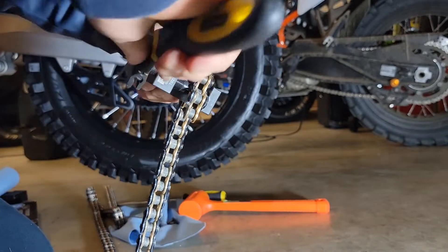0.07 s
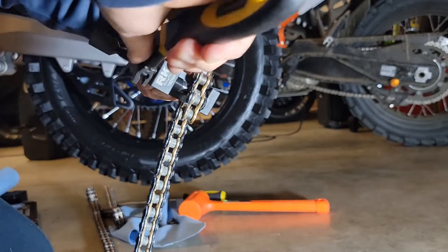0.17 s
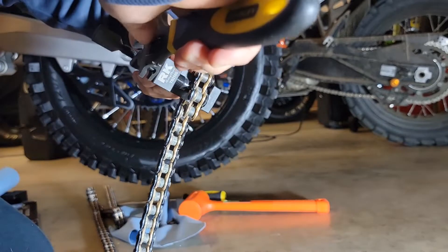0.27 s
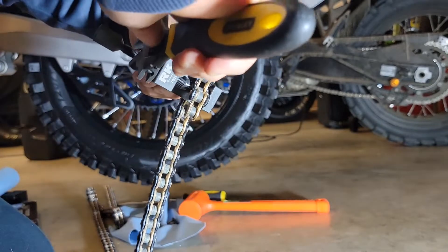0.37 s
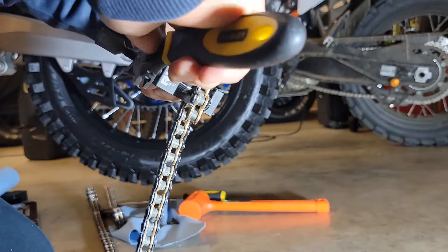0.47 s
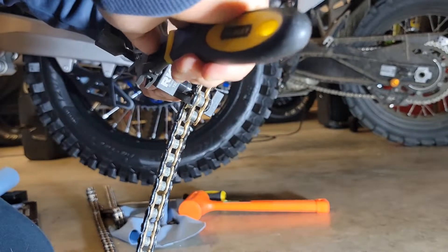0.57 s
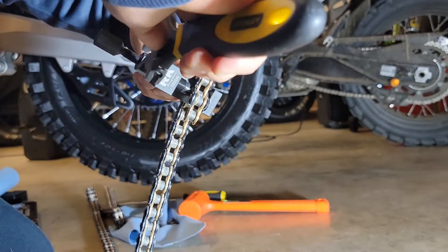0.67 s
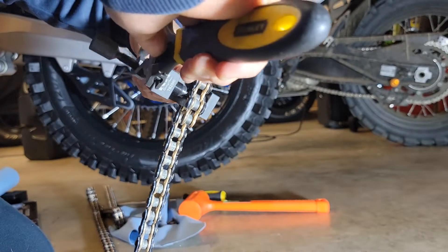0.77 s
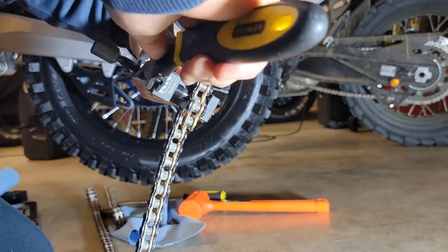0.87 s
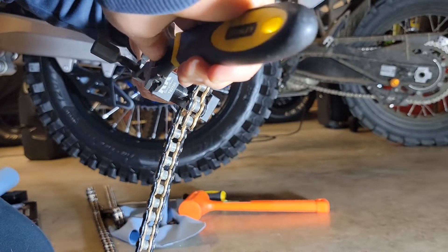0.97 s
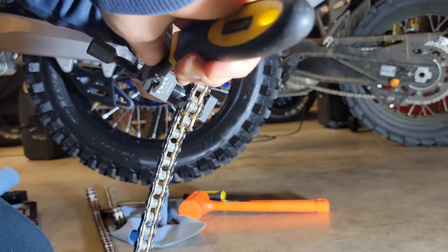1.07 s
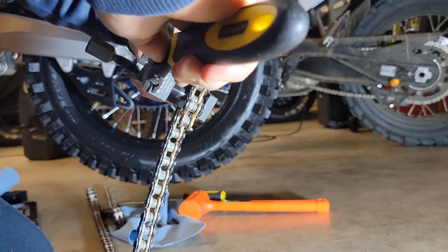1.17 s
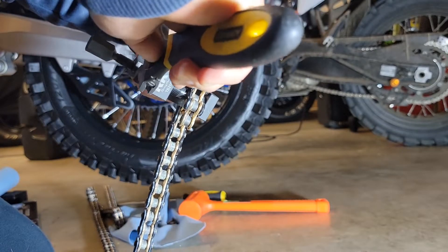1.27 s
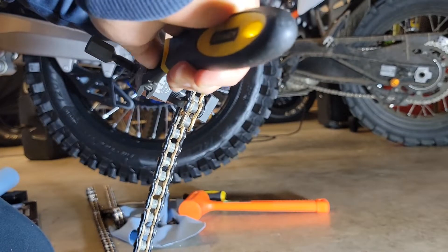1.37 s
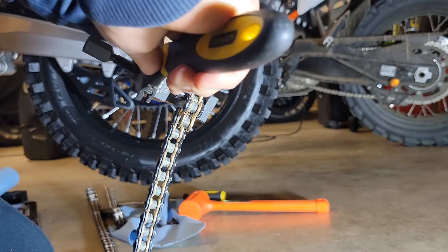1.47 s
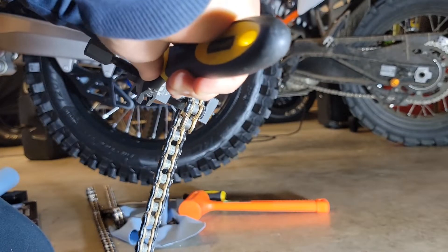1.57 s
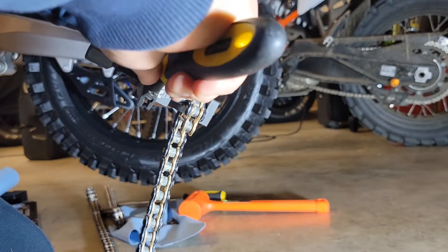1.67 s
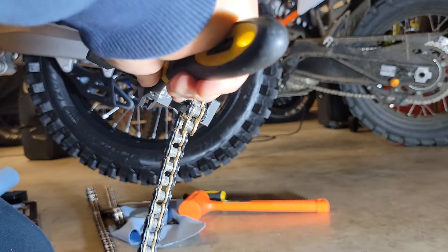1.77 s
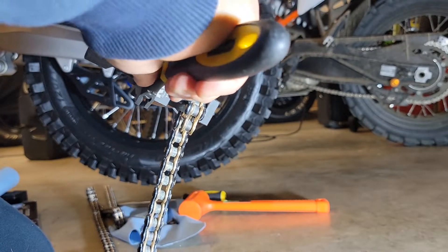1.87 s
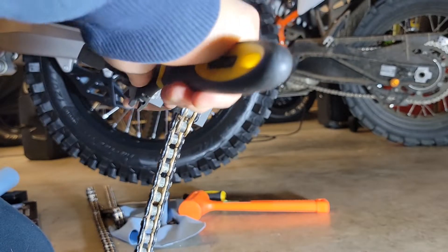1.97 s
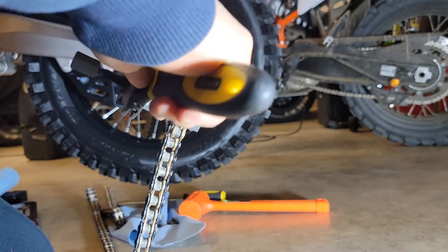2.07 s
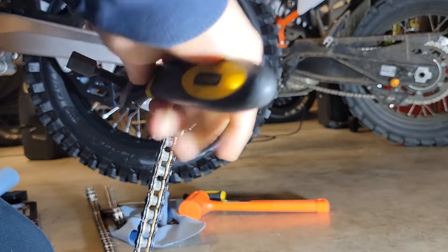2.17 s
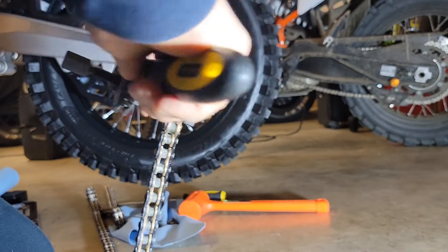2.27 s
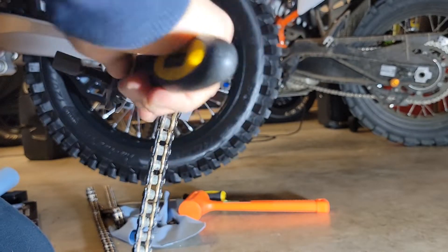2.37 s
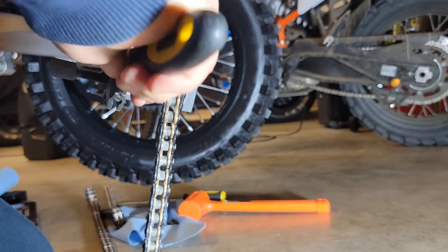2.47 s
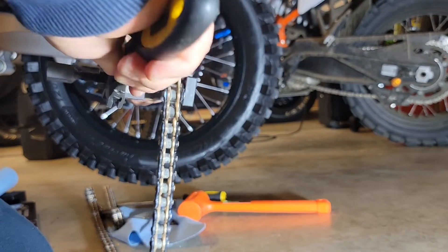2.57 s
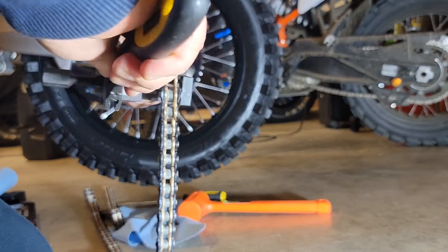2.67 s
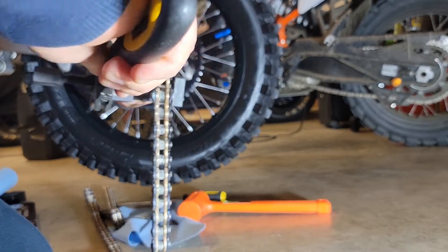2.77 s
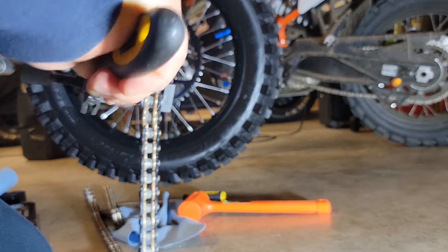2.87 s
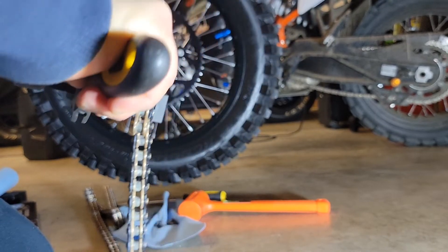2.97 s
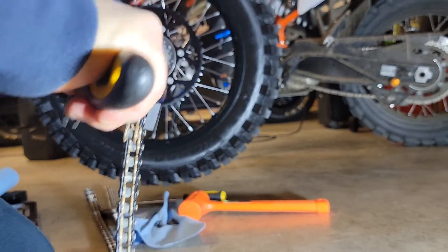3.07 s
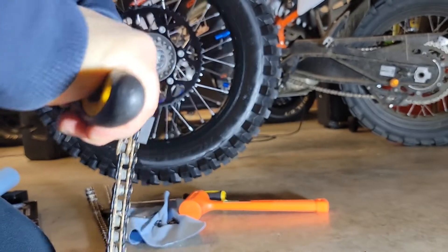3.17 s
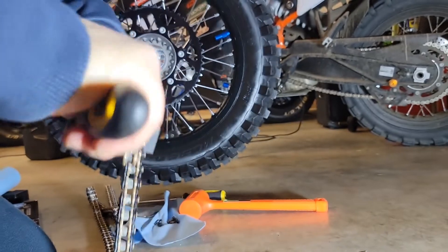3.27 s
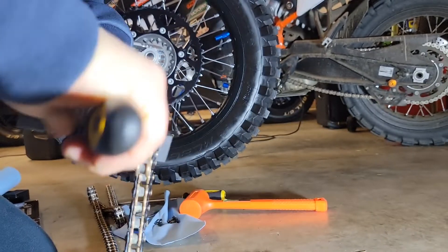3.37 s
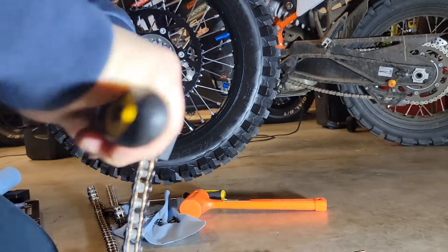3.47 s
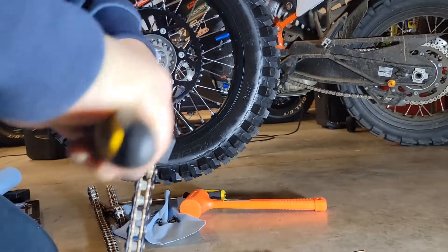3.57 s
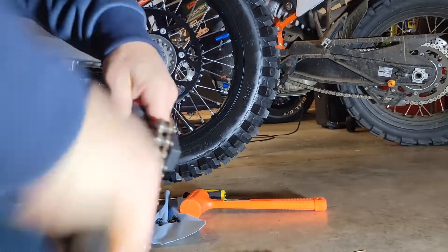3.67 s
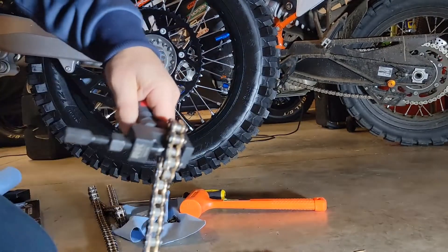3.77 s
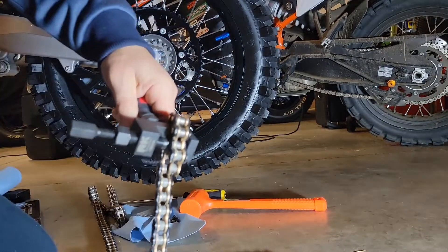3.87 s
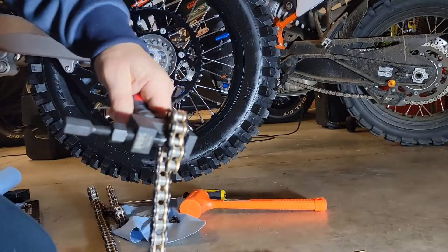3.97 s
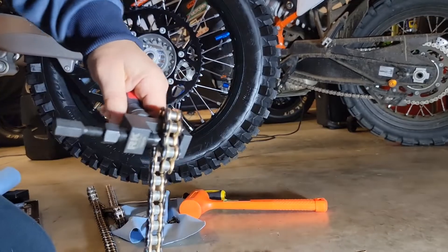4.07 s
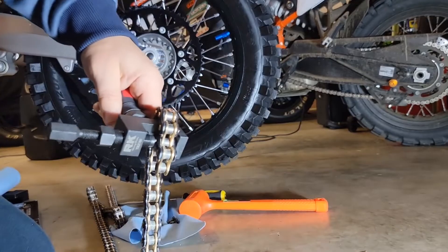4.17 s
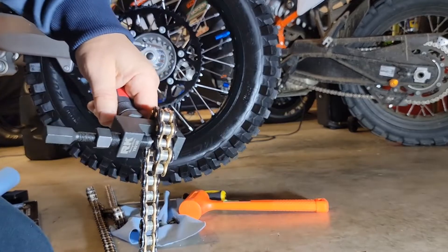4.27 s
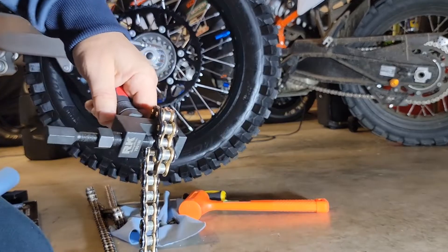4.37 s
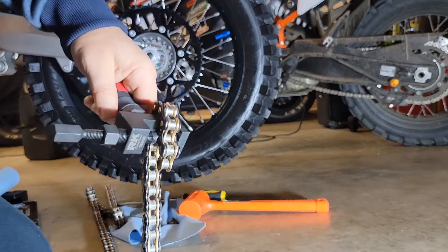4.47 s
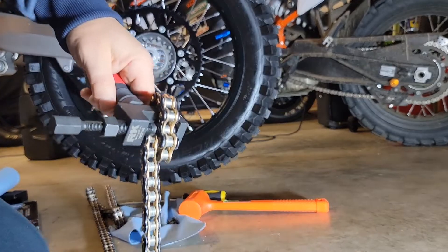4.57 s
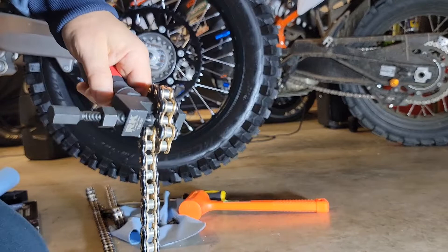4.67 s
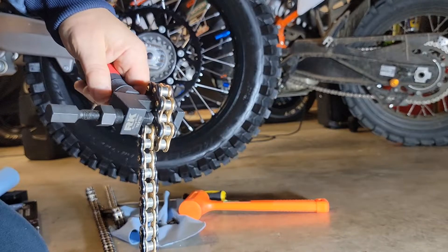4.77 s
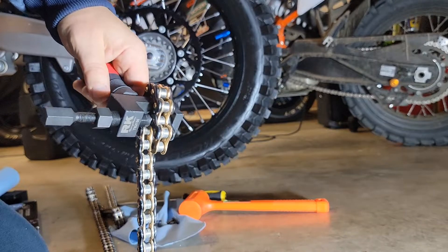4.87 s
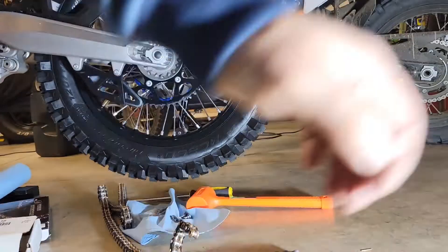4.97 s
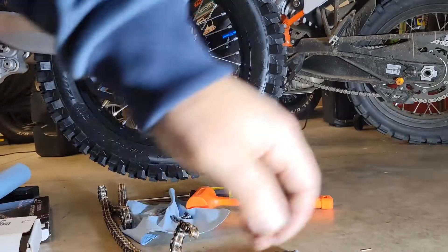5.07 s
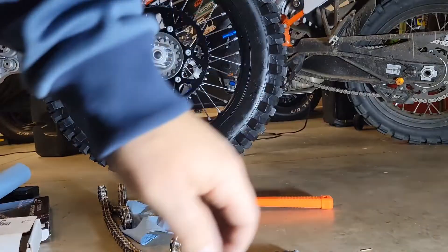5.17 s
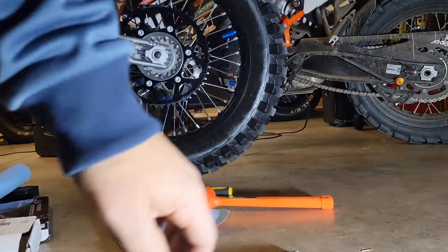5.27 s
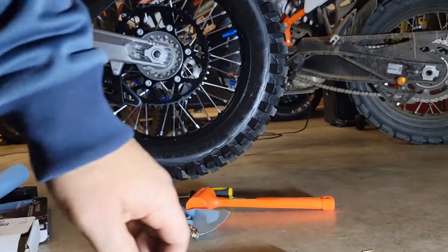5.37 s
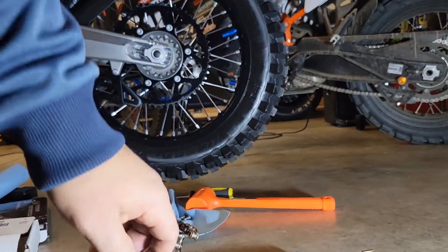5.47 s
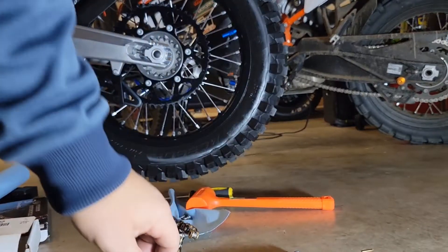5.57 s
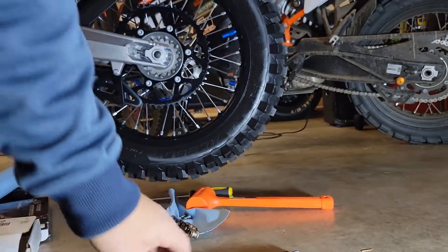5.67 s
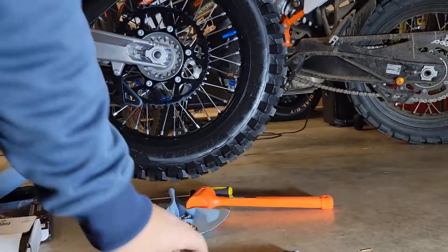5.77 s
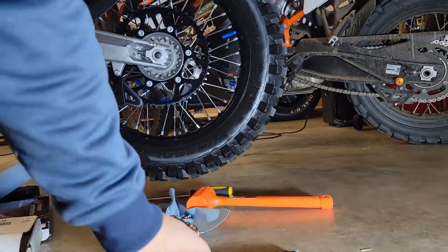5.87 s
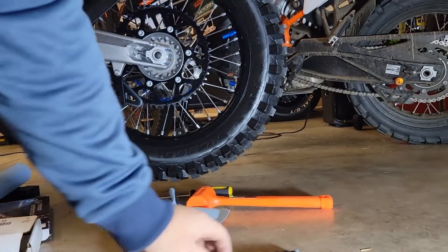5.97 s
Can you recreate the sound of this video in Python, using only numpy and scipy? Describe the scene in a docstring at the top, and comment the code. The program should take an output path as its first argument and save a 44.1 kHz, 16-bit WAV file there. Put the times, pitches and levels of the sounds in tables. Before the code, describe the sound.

A close stereo view of work in a garage, with a quiet, wavering low motor hum and faint rumbling air throughout. From 0 to 0.9 s a steel screw tool clicks sharply and irregularly, strongest near 0.05, 0.4 and 0.87 s, with short gritty metal rubs and tiny high squeaks around 0.3 and 0.75 s. Another crisp click comes at 1.2 s. From 1.4 to 3.5 s there is mostly hum, with barely audible ticks. At 3.6-3.8 s come light clicks, a soft scrape and brief rasps. At 4.03 s chain links clash brightly, then from 4.15 to 4.3 s a dense, loud jingle with dull knocks rings out quickly in the room. Sound drops out at 5.08-5.15 s, returning with a faint clink. At 5.65 s a short gritty floor scrape and soft sleeve rub close it.

```python
"""Unscrewing a chain breaker

A chain breaker is unscrewed from a motorcycle roller chain in a garage with a humming motor.
Grainy slips make the screw rub and squeak; short bursts of damped noise make the steel tool click.
The parted chain drops against it and jingles: clashes and knocks set off decaying metal modes.
After a short silence a hand reaches down, with filtered grains for a sleeve and a scrape on the floor."""
import sys
import numpy as np
from scipy import signal
from scipy.fft import rfft, irfft
from scipy.io import wavfile
from scipy.ndimage import uniform_filter1d

SR = 44100
rng = np.random.default_rng(int(sys.argv[2]) if len(sys.argv) > 2 else 0)


def pcm_store(signal):
    """Save signal as 16-bit PCM."""
    levels = np.round(np.clip(np.atleast_2d(signal), -1, 1) * 32767)
    wavfile.write(sys.argv[1], SR, levels.astype(np.int16).T)


N = 265526
TIME = np.arange(N) / SR
AGE = TIME[:SR // 2]  # seconds since a blow


def breaker():
    """The screw rubs and squeaks in its thread; the play in the tool is taken up in clicks."""
    # strokes of steel on steel, as the screw turns and the chain slides:
    # (start [s], length [s], level [dB])
    turns = [(.03, 0.051, -54.5), (.14, 0.029, -53), (.28, 0.064, -55.5), (.385, 0.058, -50),
             (.56, 0.04, -55), (.73, 0.064, -51), (.85, 0.056, -57), (1.095, .02, -72),
             (1.22, 0.037, -57.5), (1.31, 0.16, -68.5), (1.545, 0.052, -62.5), (3.66, 0.084, -60.5),
             (3.8, 0.27, -74), (5.19, 0.167, -74)]
    # colour of the rubbing thread: (frequency [Hz], level [dB])
    thread = [(200, -29), (700, -9), (1800, -7), (2100, -6.5), (2750, 2.5), (3300, -9), (3800, -9.5),
              (4500, -3), (5400, -19.5), (6700, -9.5), (8300, -36), (16000, -44)]
    # the dry screw squeaking: (start [s], length [s], first pitch [Hz], last pitch [Hz], level [dB])
    squeaks = [(0.257, 0.0084, 1940, 1860, -45.5), (0.28, 0.046, 2710, 2730, -51.5),
               (0.3, .043, 2030, 2140, -50.5), (.355, .04, 2840, 2500, -56), (.745, .065, 2796, 2820, -49)]
    # rough rubbing of the tool's jaws on the chain:
    # (start [s], length [s], first resonance [Hz], last resonance [Hz], level [dB])
    rasps = [(3.701, .058, 2100, 2400, -52), (3.703, .05, 2900, 3400, -54.5), (3.792, .15, 2500, 2300, -67),
             (3.785, .1, 3330, 3300, -66)]
    # clicks of the tool, the last one (5.635 s) the sharp start of the scrape on the floor: # (time [s], level
    # [dB], brightness [dB per octave], t60 [s], # ringing pitch [Hz], ring against burst [dB])
    clicks = [(.001, -40, 4.5, 0.044, 4470, 5.5), (0.0548, -26.5, -4.5, 0.071, 4140, -3),
              (.0647, -33.5, 0, .029, 3060, 16), (0.2547, -39, -4, 0.026, 2560, 15),
              (0.2802, -47, -13, .017, 2550, 7), (0.3325, -42.5, -11.5, 0.058, 2970, 6),
              (0.3961, -39, -3.5, 0.045, 3280, -10), (0.4065, -33.5, -9.5, 0.028, 2530, -1),
              (0.4098, -23.5, 3.5, 0.041, 4930, -10), (.5318, -35, -2.5, 0.033, 2420, 0),
              (0.759, -43, -8, .01, 3200, 10), (0.7698, -43.5, -7, 0.016, 3360, 8),
              (0.8618, -29, -4.5, 0.062, 2560, -1.5), (0.8712, -28, 1, 0.038, 2600, -37),
              (1.2282, -32.5, 0, 0.026, 6130, -6.5), (1.3234, -56.5, 9, 0.025, 2570, 7.5),
              (2.303, -62.5, 8.5, 0.13, 7360, -9), (2.458, -65, 8.5, 0.019, 6880, -9),
              (2.71, -65, -1, .016, 3870, -10), (2.744, -55, 2.5, 0.089, 6300, -3),
              (2.898, -60, 6.5, 0.059, 4530, -5), (3.224, -67, -2, .03, 4220, -2),
              (3.619, -51.5, -3, 0.043, 2470, -7), (3.652, -51, -1.5, 0.042, 2240, 18),
              (3.712, -45, -8, 0.044, 2200, 8), (3.751, -44.5, 22, 0.031, 2420, 12),
              (3.972, -41, 2, 0.044, 4560, 2), (5.174, -51.5, -4, .036, 1320, -3),
              (5.635, -45.5, -12.5, .014, 1100, 13)]
    # colour of a tool click: (frequency [Hz], level [dB])
    tool_colour = [(150, -34), (600, -22.5), (1300, -10.5), (1900, -7.5), (2500, 6), (3400, -2.5),
                   (4600, 1.5), (5700, -4), (6800, 1.5), (8000, -10.5), (9800, -21), (12500, -26.5),
                   (16000, -22.5)]

    rubbing = friction(thread, per_s=750, spread_db=-2.0, grain_t60=0.011)
    out = rubbing * strokes(turns, rise_s=0.12, swell_db=1.5, fall_t60=0.12)
    for row in squeaks:
        add(out, *squeak(row, width_hz=58, slips_per_s=1700, buzz=0.875, edge_s=0.0086))
    for row in rasps:
        add(out, *squeak(row, width_hz=350, slips_per_s=400, buzz=0.5, edge_s=0.015))
    for s, db, tilt_db, t60, hz, ring_db in clicks:
        click = burst(tool_colour, t60, alike=0, snap=1.6, tilt_db=tilt_db, ripple_db=0.2)
        click += amp(ring_db) * contact(hz, t60, width_hz=600)
        add(out, s, amp(db) * struck(click))
    return out * pan(2.6)


def chain():
    """Links clash, knock on the tool and ring on, with loose rollers jingling in between."""
    # swings of the chain that shake its loose rollers: (start [s], length [s], level [dB])
    swings = [(4.033, 0.014, -37.5), (4.19, 0.077, -26), (4.295, .015, -36), (5.2, .12, -70.5)]
    # colour of the small rollers, brighter than the links: (frequency [Hz], level [dB])
    roller_colour = [(150, -26), (700, -15), (1500, -13), (2300, -6), (3100, -13), (4500, 0), (5600, -5),
                     (6700, 4.5), (8300, 1), (9800, -1.5), (11300, -10.5), (13000, 0), (15500, -1),
                     (16500, -5)]
    # modes of the chain's plates and rollers: (frequency [Hz], level [dB], t60 [s])
    link_modes = [(515, -16, .25), (745, -12, .25), (1120, -12, .2), (1778, -11, .25), (2336, -15, .3),
                  (3334, -9, .16), (4360, -9.5, .22), (4560, -10, .24), (4912, -8, .2), (5642, -12, .25),
                  (6190, -9, .22), (6565, 0, .2), (6605, -4, .24), (6690, -6, .24), (7330, -10, .22),
                  (7827, -9, .22), (7950, -4, .2), (8292, -6, .22), (8407, -6, .22), (12768, -7, .16),
                  (12915, -6, .17), (14420, -11, .15), (14620, -9, .13), (14875, -6, .13), (15630, -7, .13)]
    # links striking the tool and each other: (time [s], clash [dB], knock [dB], contact ring [dB],
    # contact ring pitch [Hz], link ring [dB], left-right difference [dB])
    clinks = [(4.0324, -18, -21.5, -23, 4620, -39, 2.5), (4.039, -23, -34.5, -28, 4740, -40.5, 0.5),
              (4.0733, -26.5, -41.5, -33.5, 4420, -45, -3), (4.1564, -22.5, -39, -25.5, 3050, -38, 4.5),
              (4.1651, -21.5, -33, -25.5, 3430, -31.5, 1), (4.1869, -17, -20, -25.5, 1720, -27, 0.5),
              (4.192, -19, -35, -27, 4866, -29.5, -1), (4.2089, -14, -41, -19.5, 8070, -25.5, -1),
              (4.2318, -21.5, -44.5, -30.5, 4300, -33.5, 3.5), (4.2461, -23.5, -28.5, -36, 4300, -40.5, 1),
              (4.2609, -32, -46.5, -28, 7540, -35, -5.5), (4.2926, -40, -37, -25, 6550, -41.5, 5),
              (4.3085, -30, -49, -31, 6680, -43, -1), (5.153, -61, -51.5, -69, 7300, -66, 1)]
    # colour of a clash of links: (frequency [Hz], level [dB])
    clash_colour = [(150, -29), (600, -16), (1500, -13), (2400, -0.5), (3100, -5.5), (4500, 2),
                    (5700, -4.5), (6700, 3), (8400, -1.5), (9800, -4), (11300, -11.5), (13000, 1.5),
                    (14000, -6.5), (15300, 0.5), (16500, -10)]
    # a low push of the heavy parts meeting: (frequency [Hz], level [dB])
    knock_colour = [(100, -20.5), (220, -8), (350, -3), (550, 1), (800, 1.5), (1200, -2), (1800, -9),
                    (3500, -39)]
    # the bare steel body of the tool sings on: (frequency [Hz], level [dB], t60 [s])
    bar_modes = [(1990, 0, .6), (2336, -5, 0.43), (2410, -4, .55), (3250, -10, .6), (3450, -2, 0.76),
                 (3790, -2, .85), (4572, -2, .33)]

    rollers = friction(roller_colour, per_s=180, spread_db=2.0, grain_t60=0.014)
    jingle = signal.fftconvolve(rollers, ring(link_modes, detune=0.00071), axes=1)[:, :N]
    out = amp(-1.0) * rollers + amp(-7) * unit(jingle)
    out *= strokes(swings, rise_s=0.038, swell_db=-5, fall_t60=0.054)
    for s, clash_db, knock_db, contact_db, hz, ring_db, side_db in clinks:
        clash = amp(clash_db) * burst(clash_colour, t60=0.031, alike=0.15, snap=2.5, ripple_db=2.5)
        clash += amp(contact_db) * contact(hz, t60=0.044, width_hz=800)
        clash += amp(ring_db) * ring(link_modes, detune=0.0011)
        # a knock also sets the tool's body singing
        knock = burst(knock_colour, t60=0.012, alike=0, snap=5)
        knock += amp(-30.5) * ring(bar_modes, detune=0.0003)
        add(out, s, amp(knock_db) * knock * pan(1.5) + clash * pan(side_db))
    return out


def hand():
    """A gritty drag over the floor and the softer rub of a sleeve."""
    # gritty drags of chain and hand: (start [s], length [s], level [dB])
    drags = [(3.57, 0.044, -71), (3.62, 0.15, -56.5), (3.78, 0.16, -62.5), (5.6, 0.037, -66.5),
             (5.65, 0.14, -38.5), (5.82, 0.22, -66.5)]
    # colour of the grit: (frequency [Hz], level [dB])
    grit = [(120, -22), (240, -4.5), (340, -1.5), (520, -5.5), (700, -5.5), (1250, -5), (1900, -10),
            (2800, -1), (3800, -3), (5000, -11), (7400, -8), (8600, -17), (11500, -20.5), (15500, -18)]
    # moves of the arm that rub the sleeve: (start [s], length [s], level [dB])
    reaches = [(3.62, 0.44, -62.5), (5.17, 0.19, -64.5), (5.64, 0.29, -48.5), (5.98, 0.035, -66.5)]
    # colour of the cloth: (frequency [Hz], level [dB])
    cloth = [(120, -12.5), (250, -2), (350, 6), (580, -4), (760, 3.5), (885, 1), (1050, -18), (1340, -8),
             (1650, -8), (2400, -9.5), (4500, -30), (7300, -20), (9000, -38.5), (16000, -36)]

    drag = friction(grit, per_s=2000, spread_db=-2.5, grain_t60=0.0092)
    drag *= strokes(drags, rise_s=0.042, swell_db=4, fall_t60=0.025)
    sleeve = friction(cloth, per_s=360, spread_db=0.5, grain_t60=0.057)
    sleeve *= strokes(reaches, rise_s=0.06, swell_db=-0.5, fall_t60=0.5)
    return drag * pan(1.6) + sleeve * pan(1.1)


def friction(points, per_s, spread_db, grain_t60):
    """Tiny slips of uneven size, each a short puff of noise through the rubbed body's colour."""
    sizes = amp(spread_db * np.minimum(rng.exponential(1, N), 3))
    slips = (rng.random(N) < per_s / SR) * sizes
    # the puffs add up in power, which falls 60 dB in grain_t60
    power = signal.lfilter([1], [1, -amp(-120 / (grain_t60 * SR))], slips ** 2)
    return unit(colour(np.sqrt(power) * pair(N, 0.022), points))


def strokes(rows, rise_s, swell_db, fall_t60):
    """Gain of a series of moves that share one shape."""
    return sum(stroke(*row, rise_s, swell_db, fall_t60) for row in rows)


def stroke(start, length, db, rise_s, swell_db, fall_t60):
    """Gain of one rubbing move: it builds up to its start, swells or sags while it lasts, then dies away."""
    since_start = TIME - start
    since_end = TIME - start - length
    attack = 60 * np.minimum(since_start, 0) / rise_s
    hold = swell_db * (np.clip(since_start / length, 0, 1) - 0.5)
    release = -60 * np.maximum(since_end, 0) / fall_t60
    return amp(db + np.maximum(attack + hold + release, -120))


def squeak(row, width_hz, slips_per_s, buzz, edge_s):
    """Uneven stick-slip drives one gliding mode as the grip changes; each slip also buzzes around it."""
    start, length, first_hz, last_hz, db = row
    t = np.arange(-edge_s, length + edge_s, 1 / SR)
    pitch = np.interp(t, [0, length], [first_hz, last_hz])
    slips = pair(len(t), 0) * (rng.random(len(t)) < slips_per_s / SR)
    tone = unit(resonate(slips, pitch, width_hz))
    tone += buzz * unit(resonate(slips, pitch, width_hz=1200))
    fade = np.interp(t, [-edge_s, 0, length, length + edge_s], [0, 1, 1, 0])
    return start - edge_s, amp(db) * unit(tone) * fade


def burst(points, t60, alike, snap, tilt_db=0, ripple_db=0):
    """A sharp contact, then decaying noise as a crowd of heavily damped modes, different for every blow."""
    crowd = pair(len(AGE), alike) * amp(-60 * AGE / t60)
    crowd[:, 0] += snap
    return struck(colour(crowd, points, tilt_db, ripple_db))


def contact(hz, t60, width_hz):
    """Each point of contact favours its own short, broad resonance."""
    crowd = pair(len(AGE), 0) * amp(-60 * AGE / t60)
    return struck(resonate(crowd, hz, width_hz))


def ring(modes, detune):
    """Free modes, excited differently by every blow, with their own level and phase in each channel."""
    out = np.zeros((2, len(AGE)))
    for hz, db, t60 in modes:
        blow_hz = hz * (1 + detune * rng.standard_normal())
        swing = 2 * np.pi * (blow_hz * AGE + rng.random((2, 1)))
        level_db = db + 2 * rng.standard_normal((2, 1))
        out += amp(level_db - 60 * AGE / t60) * np.sin(swing)
    return struck(out)


def resonate(x, hz, width_hz):
    """A resonance that may glide: shift down to zero, smooth twice, shift back."""
    turn = np.exp(2j * np.pi * np.cumsum(hz * np.ones(x.shape[1])) / SR)
    r = np.exp(-np.pi * width_hz / SR)
    smooth = signal.lfilter([(1 - r) ** 2], [1, -2 * r, r * r], x / turn + 1e-18)
    return (turn * smooth).real


def colour(x, points, tilt_db=0, ripple_db=0, size=2048):
    """Causal filter: a spectrum, tilted by some dB per octave, with chance peaks a few hundred Hz wide."""
    hz = abs(np.fft.fftfreq(size, 1 / SR))
    peak_hz = np.arange(0, SR, 220)
    peaks = np.interp(hz, peak_hz, rng.standard_normal(len(peak_hz)))
    octaves = np.log2(np.clip(hz, 1000, 9000) / 1000)  # the tilt acts from 1 to 9 kHz
    log_gain = np.log(amp(at_hz(points, hz) + ripple_db * peaks + tilt_db * octaves))
    # minimum phase: the sound starts at once
    taps = np.fft.ifft(np.exp(np.conj(signal.hilbert(log_gain)))).real
    return signal.oaconvolve(x, taps[None], axes=1)[:, :x.shape[1]]


def pair(length, alike):
    """Two channels of partly shared white noise."""
    return blend(*rng.standard_normal((2, length)), np.clip(alike, -1, 1))


def blend(a, b, alike):
    """Stereo from two independent noises; the second channel shares the first to the degree alike."""
    return np.array([a, alike * a + np.sqrt(1 - alike ** 2) * b])


def pan(db):
    """Channel gains for a left-right difference in dB."""
    return amp([[db / 2], [-db / 2]])


def struck(x, size=176):
    """Scales a blow so that its first 4 ms have rms 1."""
    return x / np.sqrt(np.mean(x[:, :size] ** 2))


def amp(db):
    """Turns dB into an amplitude factor."""
    return 10 ** (np.asarray(db) / 20)


def unit(x):
    """Scales to rms 1."""
    return x / np.sqrt(np.mean(x ** 2) + 1e-20)


def at_hz(points, hz):
    """Reads a spectrum on a log-frequency axis."""
    f, value = np.transpose(points)
    return np.interp(np.log(hz + 1), np.log(f + 1), value)


def add(mix, s, sound):
    """Mixes a stereo sound in at time s."""
    part = mix[:, max(round(s * SR), 0):][:, :sound.shape[1]]
    part += sound[:, :part.shape[1]]


def garage(x, first_s=0.0031):
    """Scattered reflections that begin with the floor and decay at a rate set by frequency."""
    # decay of the room: (frequency [Hz], t60 [s])
    room_t60 = [(150, 0.59), (700, 0.33), (2500, 0.5), (5000, 0.41), (8000, 0.34), (15000, .25)]
    signs = rng.choice([-1., 1.], (2, SR))
    taps = signs * (rng.random((2, SR)) < 4000 / SR) * (TIME[:SR] > first_s)
    hz, t, z = signal.stft(taps, SR, nperseg=256)
    decay = amp(-60 * t / at_hz(room_t60, hz)[:, None])
    tail = signal.istft(z * decay, SR, nperseg=256)[1]
    return signal.fftconvolve(x, tail / np.linalg.norm(tail[0]), axes=1)[:, :N]


def motor_hum():
    """A wavering motor hum of a few orders of its rotation, and a trace of mains hum."""
    # the motor turns a little slower than the mains field that drives it
    motor_hz, mains_hz = 117.55, 120.0
    # partials of the hum: (multiple of motor_hz, level [dB])
    orders = [(.5, -24), (1, 2), (2, -16.5), (3, -33), (4, -39)]
    # the hum wavers: (time [s], level [dB])
    hum_level = [(0, -51), (.22, -42.5), (.67, -51.5), (.99, -45.5), (1.2, -49), (1.54, -48), (1.85, -43.5),
                 (2.22, -44.5), (2.42, -47.5), (2.63, -44), (2.88, -47), (3.5, -47), (3.95, -44.5),
                 (4.45, -49.5), (4.85, -51.5), (5.08, -44), (5.38, -49.5), (6.02, -40.5)]

    hum = np.zeros(N)
    for k, db in orders:
        hum += amp(db) * np.sin(2 * np.pi * (k * motor_hz * TIME + rng.random()))
    hum = unit(hum) * amp(np.interp(TIME, *np.transpose(hum_level)))
    mains = unit(np.sin(2 * np.pi * (mains_hz * TIME + rng.random())))
    return hum + amp(-60.5) * mains


def room_air():
    """Low rumble and faint hiss: noise shaped in frequency, its lows partly shared by the channels."""
    # colour of the room air: (frequency [Hz], level [dB])
    air_colour = [(15, -8), (35, -2), (66, 0), (90, -9), (150, -9), (180, -16), (225, -11), (310, -24),
                  (800, -29), (1100, -35), (1700, -39), (3600, -48), (3820, -41), (4100, -49), (4800, -50),
                  (7400, -47), (8400, -58), (16000, -58)]
    # likeness of the two channels: (frequency [Hz], likeness [0-1])
    likeness = [(100, 0.79), (220, 0.81), (450, 0), (1000, 0), (16000, 0)]
    bins = np.fft.rfftfreq(N, 1 / SR)
    a, b = rfft(rng.standard_normal((2, N)))
    spectrum = blend(a, b, np.clip(at_hz(likeness, bins), 0, 1))
    return amp(-50.5) * unit(irfft(spectrum * amp(at_hz(air_colour, bins)), N))


def background():
    """The hum of the motor and mains over the air of the room."""
    return motor_hum() * pan(-1.0) + room_air() * pan(-0.4)


def scene():
    """Tool, chain and hand, each also sent to the garage's reflections, over the background."""
    tool, links, reach = breaker(), chain(), hand()
    sends = amp(-15.0) * tool + amp(-9) * links + amp(-14.0) * reach
    return tool + links + reach + garage(sends) + background()


def record(dry):
    """All sound cuts out for a moment, down to a faint trace; then a lowpass limits the band."""
    # the cut: (start [s], end [s])
    pause = (5.079, 5.152)
    live = 1. * ((TIME < pause[0]) | (TIME > pause[1]))
    live = uniform_filter1d(live, size=30)  # softens the edges of the cut
    lowpass = signal.firwin(301, 15950, window=("kaiser", 8), fs=SR)  # cutoff in Hz
    return signal.oaconvolve(dry * (live + amp(-52.5)), lowpass[None], "same")


dry = scene()
out = record(dry)
pcm_store(out)
```